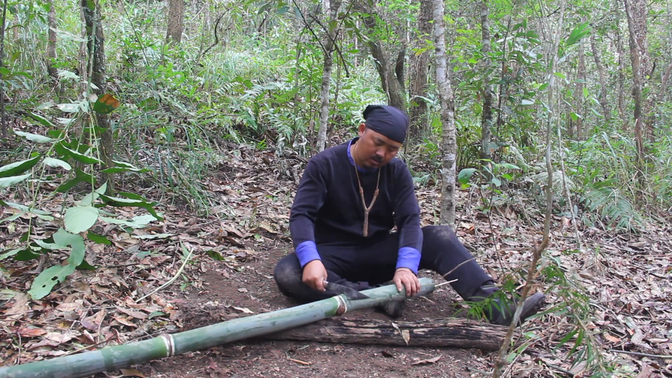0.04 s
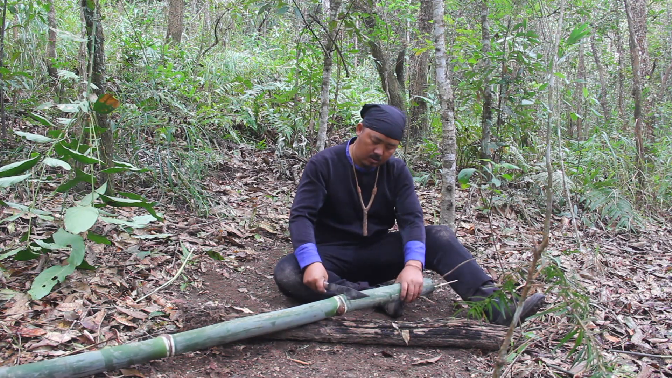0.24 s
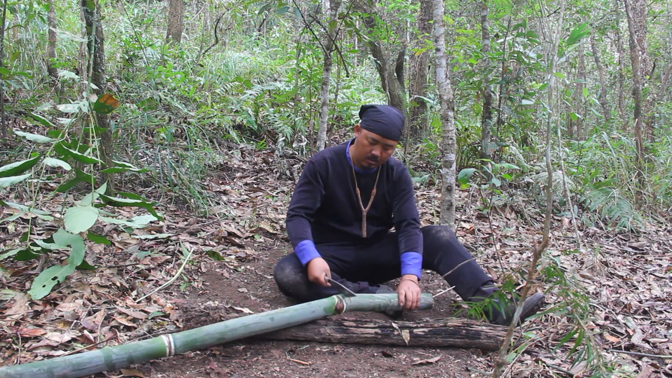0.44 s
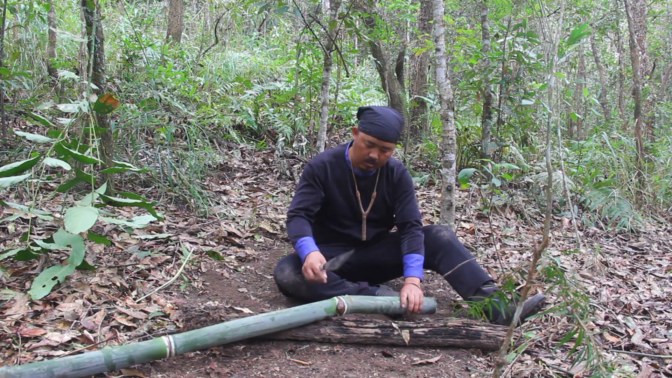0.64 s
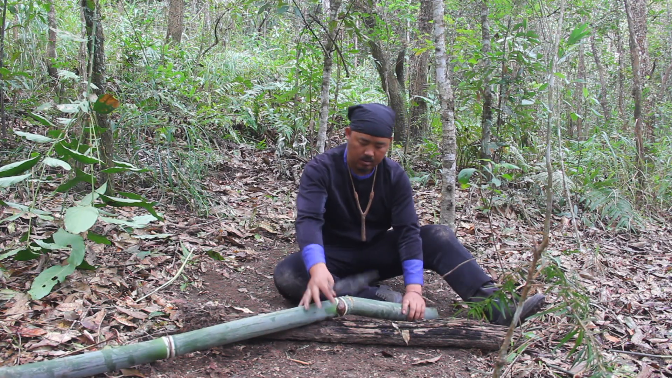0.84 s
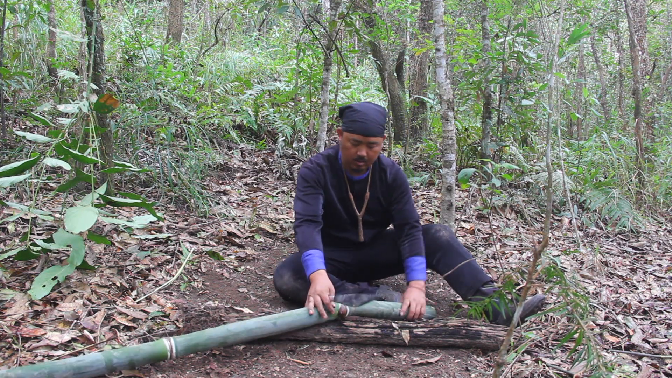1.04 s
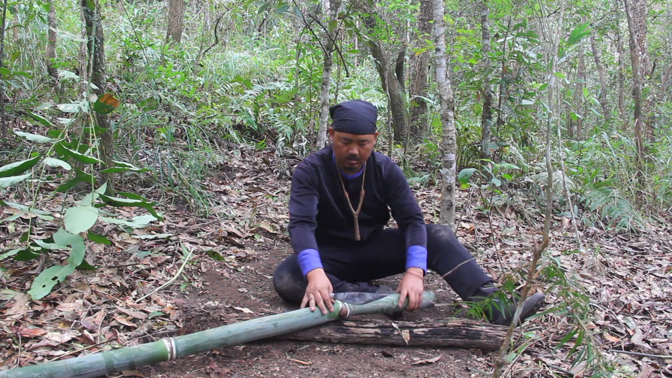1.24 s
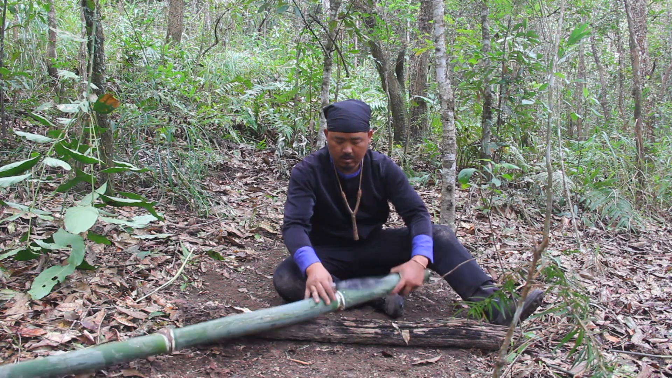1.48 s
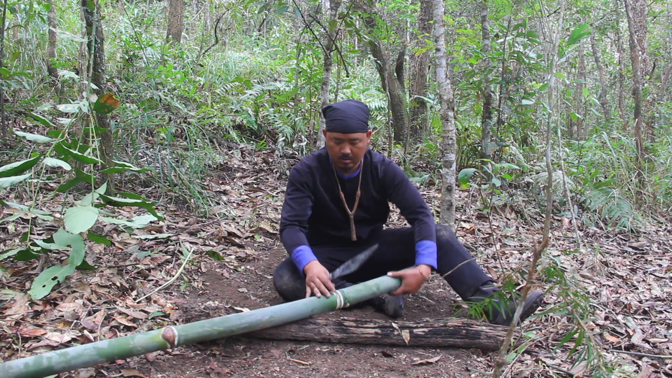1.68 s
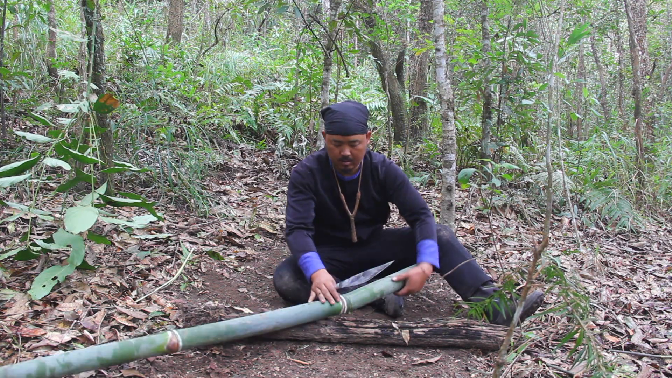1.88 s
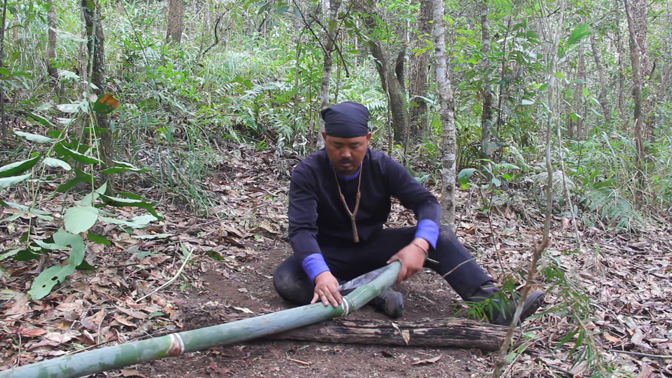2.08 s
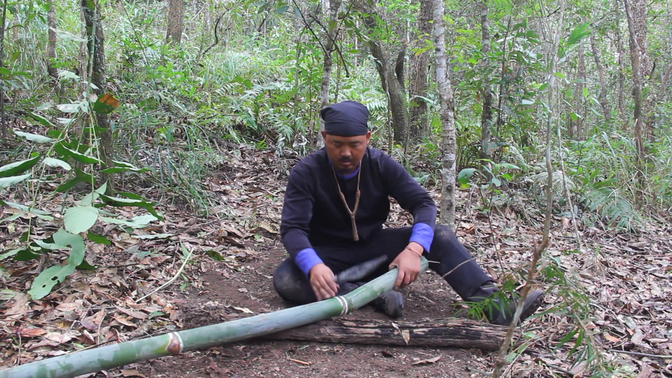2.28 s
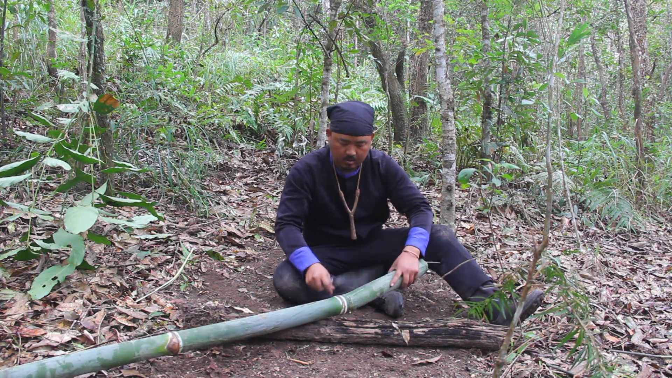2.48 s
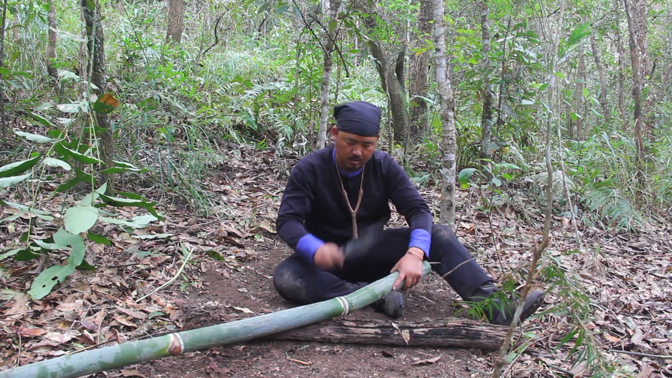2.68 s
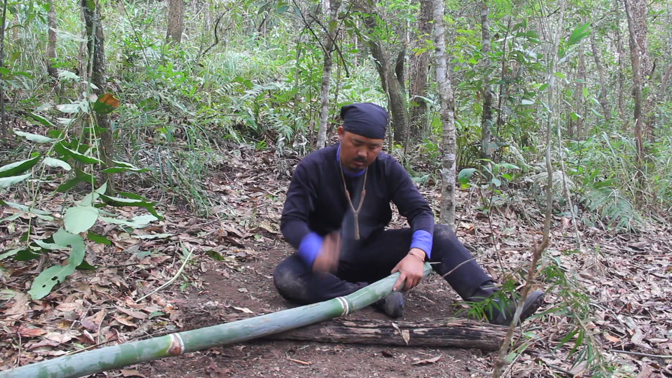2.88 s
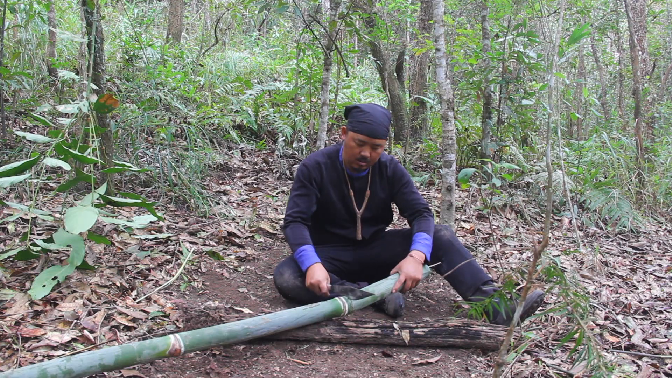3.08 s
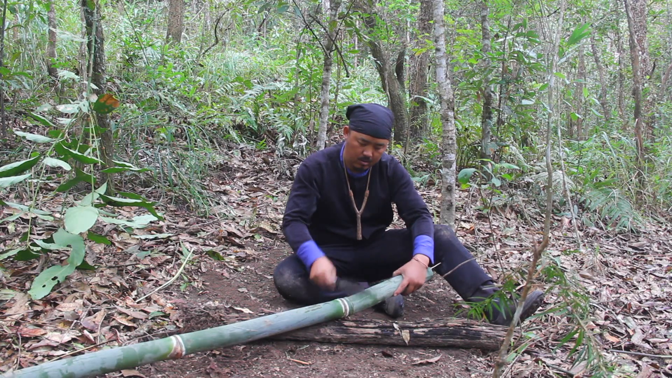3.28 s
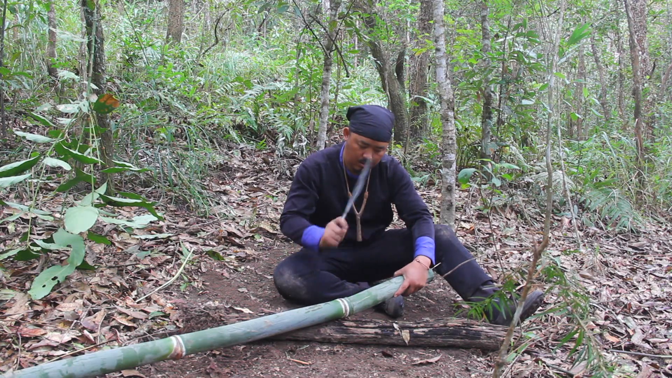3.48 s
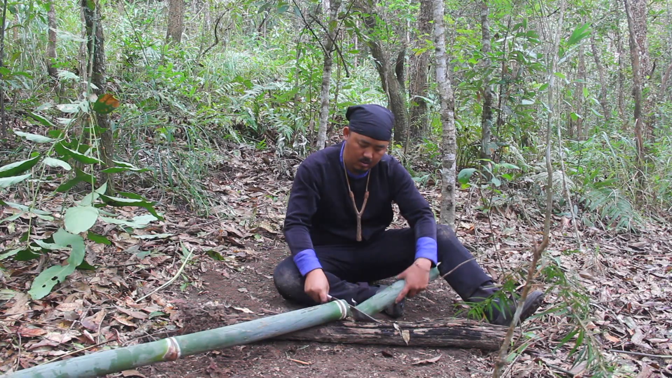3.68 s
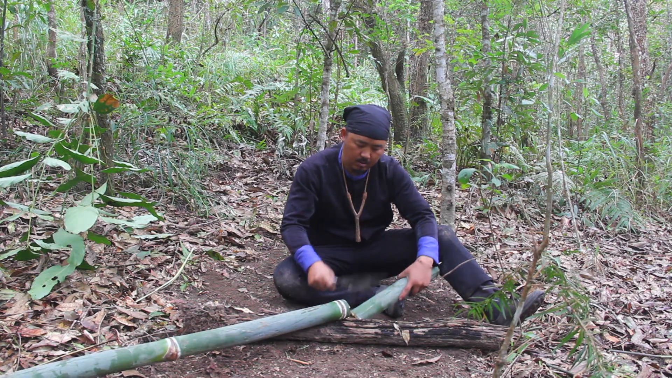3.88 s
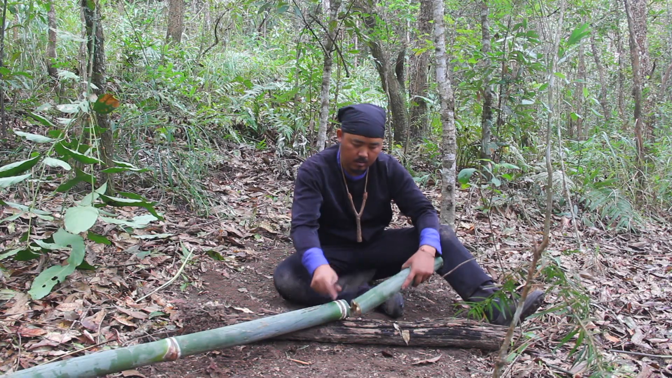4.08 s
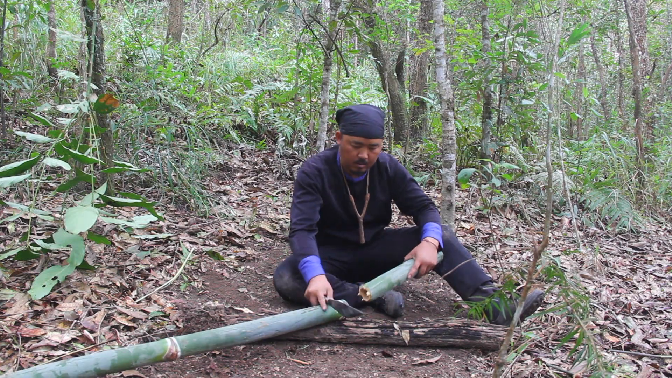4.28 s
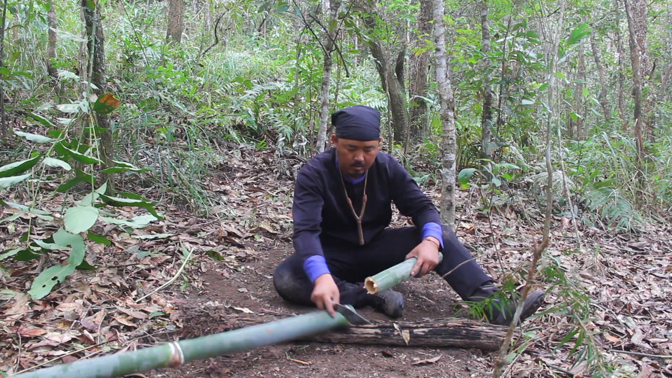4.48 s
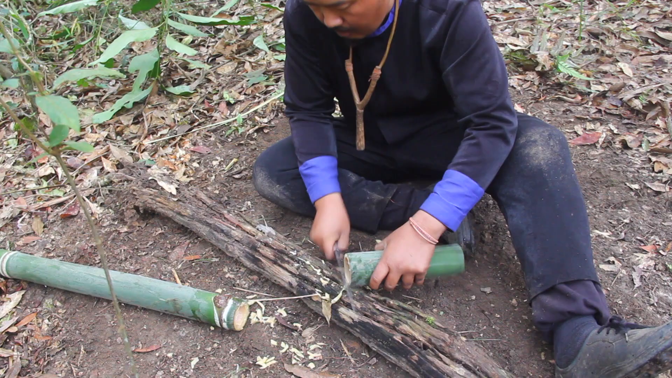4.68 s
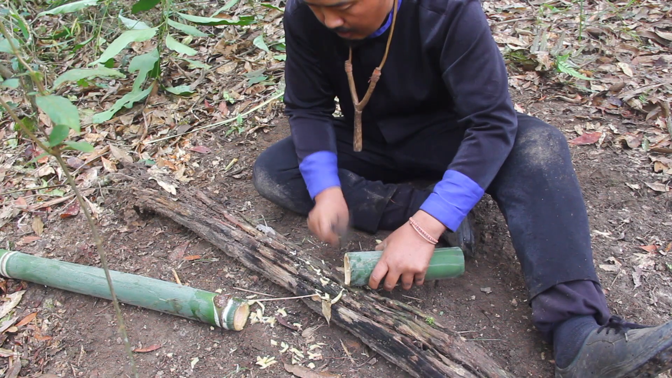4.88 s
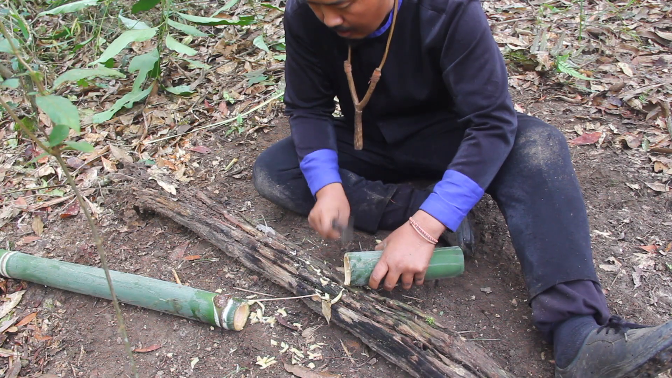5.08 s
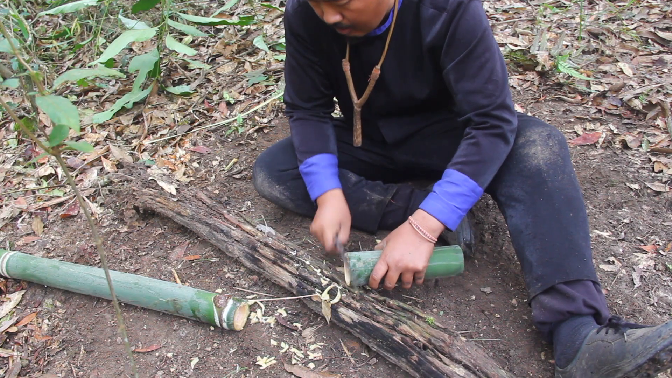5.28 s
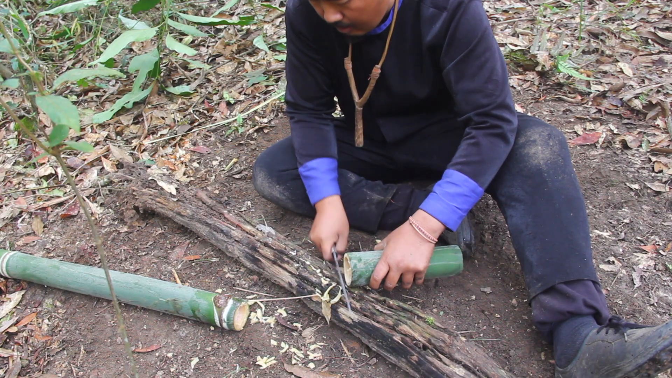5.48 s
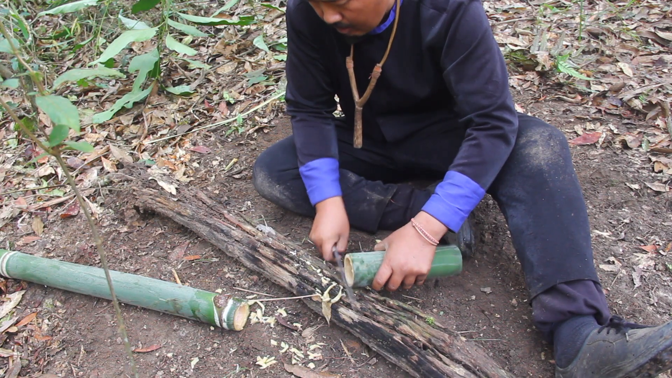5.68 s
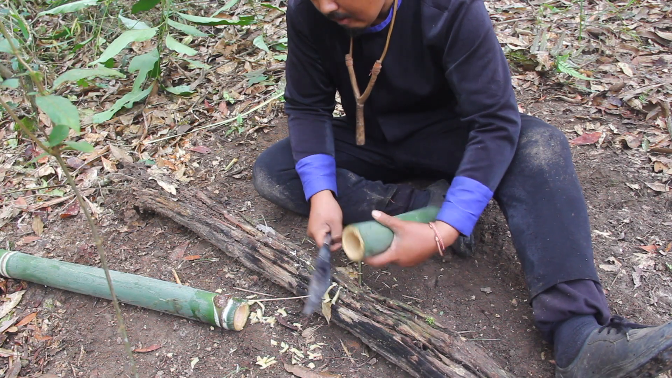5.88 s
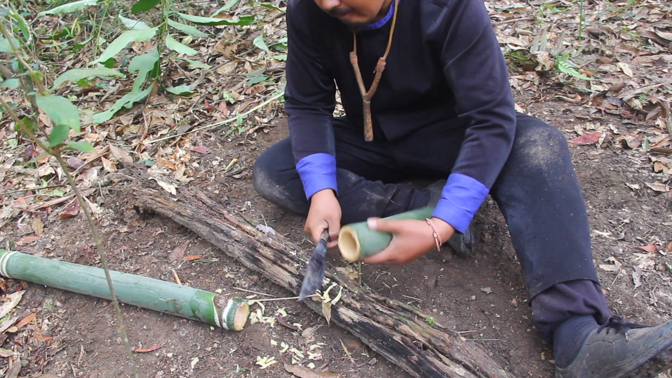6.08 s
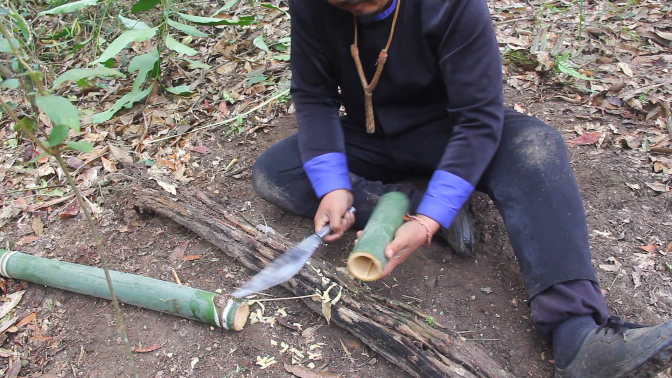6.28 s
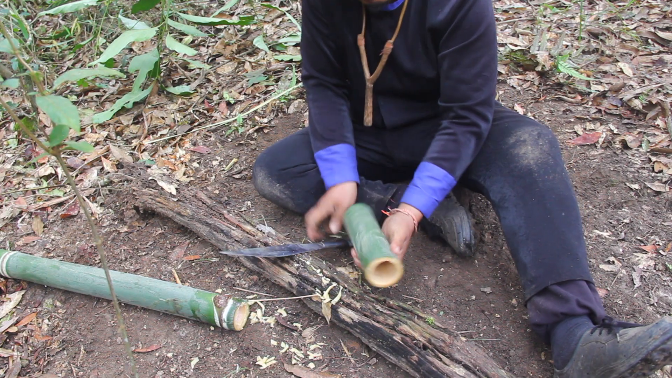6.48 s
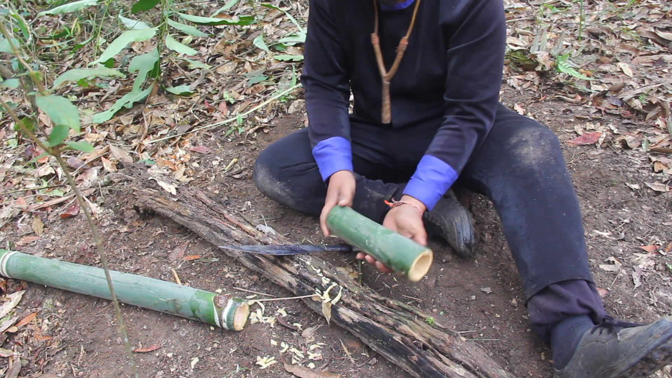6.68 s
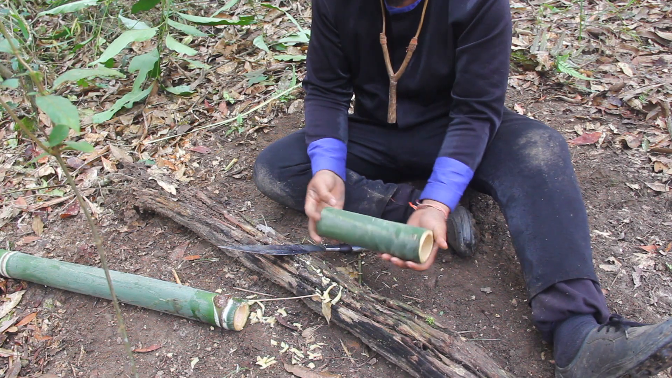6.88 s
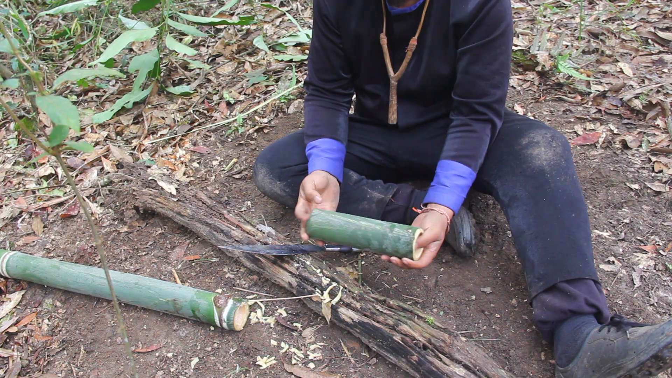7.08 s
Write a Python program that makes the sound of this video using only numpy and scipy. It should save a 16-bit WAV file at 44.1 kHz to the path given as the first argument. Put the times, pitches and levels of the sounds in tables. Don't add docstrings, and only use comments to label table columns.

```python
import sys
import numpy as np
from scipy import signal
from scipy.io import wavfile
from scipy.ndimage import uniform_filter1d

SR = 44100
rng = np.random.default_rng(int(sys.argv[2]) if len(sys.argv) > 2 else 0)


def decibels_to_gain(level_db):
    exponent = np.asarray(level_db, float) / 20
    return 10 ** exponent


def output_pcm(signal):
    pcm = np.clip(np.atleast_2d(signal).T, -1, 1) * 32767
    wavfile.write(sys.argv[1], SR, np.round(pcm).astype(np.int16))


N = 314874

CHANGE_S = 4.714
POLE_THROUGH_S, PIECE_THROUGH_S = 3.5, 5.1

# start in seconds, peak in dB, bite in ms, and the
# hollow ring and wall ring in Hz that the struck spot favours.
CHOPS = [
    (-.04, 8.5, 4.5, 600, 1800),
    (2.953, 7.5, 4.56, 251.6, 3500),
    (3.605, 6, 4.8, 466, 1874),
]
# start in seconds, peak in dB, thud in dB, favoured hollow ring in Hz, favoured wall
# ring in Hz.
BUMPS = [
    (.967, -23, -28, 242, 3500),
    (2.542, -11.5, -14.5, 370, 2055),
    (3.284, -24, -47.5, 652, 2780),
    (3.858, -43, -40, 130, 1000),
    (4.305, -16, -21, 460, 1846),
    (4.548, -20.5, -32, 450, 1300),
    (4.577, -25, -31, 450, 1300),
    (4.641, -8, -14, 630, 2770),
]
# start in seconds, peak in dB, bite in ms,
# favoured hollow ring in Hz, favoured wall ring in Hz.
TRIMS = [
    (4.728, -.5, 9.5, 380, 3576),
    (4.9767, 0, 9.5, 622, 4450),
    (5.232, 0.5, 5.4, 802, 6400),
    (5.4788, 2.5, 6.2, 481.5, 5460),
    (5.7197, -2.5, 2.52, 417, 2435),
]
# start in seconds, peak in dB, thud in dB,
# favoured hollow ring in Hz, favoured wall ring in Hz.
TAPS = [
    (5.524, -17.5, -62, 620, 3940),
    (6.34, -51, -39.5, 362, 1290),
    (6.363, -49, -36.5, 405, 1300),
    (6.412, -50.5, -43, 340, 1620),
]
# start in seconds, peak in dB, graze in ms.
GRAZES = [(4.625, -21.5, 5), (4.631, -10.5, 11), (4.717, -6.5, 8.5), (4.972, -25, 2.8), (5.222, -13.5, 13),
          (5.472, -18.5, 5), (5.703, -26, 12)]
GRAZE_LEAD_S = .022
CHOP_THUD_DB, CHOP_ECHO_DB, BUMP_ECHO_DB = -5.5, -35, -37.5
TRIM_THUD_DB, TRIM_ECHO_DB, TAP_ECHO_DB = 0, -44, -38
BUMP_MS = 3.3
THUD_LOSS_DB_PER_MS = 2.24
FULL_BITE_MS = 8.9

# pitch in Hz, width in Hz, level in dB.
POLE_WALL = [(1000, 200, -5), (1270, 120, -13), (2030, 430, -2), (2257, 99, 2.5), (2750, 750, -7.5),
             (3596, 300, 3), (4530, 440, -4.5), (5040, 83, -3), (5580, 270, -8.5), (7100, 250, -4.5),
             (7850, 1200, -10), (10800, 600, -31.5)]
PIECE_WALL = [(804, 450, 0.5), (1350, 420, 3), (1780, 370, 3.5), (2435, 220, -8.5), (2670, 70, -6.5),
              (3060, 590, 2), (4140, 405, -4), (4450, 160, -1), (5460, 750, -13.5), (6680, 160, -6),
              (7020, 55, -9.5), (7910, 380, -4.5), (9130, 110, -15.5), (13000, 900, -16)]
# pitch in Hz, level in dB,
# time to die by 60 dB in seconds.
POLE_CUT = [(76.1, -36, 0.62), (107, -33.5, 0.44), (196.8, -22, .8), (303, -1, 0.021), (676, -10, 0.035),
            (2074, 8, 0.0195)]
POLE_LOOSE = [(174, -18, 0.33), (202, -18, .45), (284.2, -3.5, .11), (491, 6.5, 0.023), (616, -4.5, 0.12),
              (1040, -3.5, .03)]
PIECE = [(106, -14, 0.12), (300, -21.5, .036), (366.5, -2, 0.023), (622, -10.5, 0.098), (800, -4, 0.01),
         (1200, 5.5, 0.021), (1886, 21.5, 0.029)]
POLE_PARTING = [(100.7, -30, 0.37), (198, -17.5, 0.72), (317, -16, .4), (441, -20, 0.079),
                (474, -11.5, 0.18), (872, -11, 0.18), (1940, 12, 0.016)]
POLE_STUB = [(104, -18, 0.1), (207, -26, 0.27), (451, -14, 0.11), (630, -15.5, 0.065), (936, 0, 0.06)]
PIECE_DOWN = [(97.6, -29, 0.19), (301.6, -6.5, 0.1), (340, -2.5, 0.058), (421.7, 2.5, 0.0372),
              (638, 3.5, .036), (810, 1, 0.026), (967, -4.5, .016), (1350, 2, 0.031)]
# low edge in Hz, high edge in Hz, time to die in seconds, level in dB.
LOG = [(140, 860, 0.12, -7.5), (540, 2240, 0.042, 5.5), (1400, 4300, .04, -5)]
CHOP_FAVOUR = [(4.9, .3), (4.3, 0.26, -1.5), 5.5]
TRIM_FAVOUR = [(15.6, 0.11), (11, .12, -1), 3]
KNOCK_FAVOUR = [(7.6, 0.3), (5, .5, 0), 3.5]

# start in seconds, peak in dB, thud in dB.
CRACK = [(.374, 1, -26.5)]
HEEL = [
    (1.415, -60, -53),
    (1.74, -30.5, -43),
]
# pitch in Hz, level in dB, time to die in seconds.
CRACKED = [(184, -24, .4), (555, 6, 0.076), (965, 4.5, .15), (1800, 15, .063)]
SOIL = [(77.5, -9, 0.51), (178, 7, 0.08)]
CRACK_MS, CRACK_ECHO_DB = 2.1, -35

# start in seconds, peak in dB.
SNAPS = [(0.349, -18.5), (.4027, -28), (.43, -22.5), (0.46, -19), (0.4815, -14), (0.491, -21),
         (0.5262, -24), (.5337, -21), (0.5758, -26), (0.5875, -30.5), (0.799, -28.5), (.8135, -23.5),
         (0.8616, -18.5), (.891, -16)]
RIPS = [(0.3417, -19), (0.3589, -10), (0.3652, -6), (0.51, -25.5), (0.706, -30), (0.786, -27), (0.813, -17),
        (.83, -16), (0.8427, -24), (0.8498, -16.5), (0.874, -22)]
SNAP_MS, RIP_MS = 2.8, 8
# pitch in Hz, width in Hz, level in dB.
SPLIT_BODY = [(600, 196, -2), (1000, 190, 1), (1800, 180, 0.5), (3580, 160, 11), (5100, 160, 6),
              (6400, 580, 1.5), (10360, 620, -16.5)]

# middle in seconds, half width in seconds, level in dB.
LEAVES = [(0.386, .024, -31), (0.896, 0.028, -38.5), (1.082, 0.059, -50), (1.319, 0.0087, -58.5),
          (1.412, 0.053, -45), (1.981, 0.033, -41), (2.1, 0.023, -52.5), (2.434, 0.022, -51),
          (3.314, 0.012, -48), (4.608, 0.017, -43), (4.681, 0.074, -40.5)]
SLEEVES = [(.45, 0.018, -46), (.55, 0.067, -49.5), (1.23, 0.054, -57.5), (1.55, 0.045, -51),
           (1.653, 0.032, -43.5), (1.83, 0.076, -51), (2.25, 0.12, -59), (3.541, 0.0039, -56.5),
           (4.46, 0.041, -47.5), (4.548, 0.019, -44.5), (6.2, 0.041, -52), (6.33, 0.054, -47.5),
           (6.5, 0.081, -52), (6.72, 0.054, -54.5), (6.897, 0.054, -49)]
LEAF_TOP_DB, SLEEVE_TOP_DB = -8, -20.5
# pitch in Hz, level in dB.
LITTER = [(150, -17), (400, -5.5), (1000, -3.5), (2500, -2), (5000, -3), (8000, -9), (12000, -23.5)]
# start in seconds, peak in dB.
TICKS = [(1.049, -31), (1.0722, -31), (1.135, -36.5), (1.1939, -29), (1.3865, -30), (1.416, -30),
         (1.4497, -29), (1.5476, -37), (1.5885, -29.5), (1.6489, -30.5), (1.7377, -38), (1.7705, -36),
         (1.9163, -29), (1.949, -33.5), (2.0846, -38.5), (2.1117, -34), (2.4037, -31), (4.4265, -34.5),
         (4.4536, -23), (4.4775, -57), (4.4971, -30), (4.5494, -49.5), (4.7057, -19.5), (5.7484, -33.5),
         (5.787, -39.5)]
TICK_LOW_HZ, TICK_SPAN_OCT = 4300, .9
# start in seconds, length in seconds, level in dB, pitch in Hz.
SQUEAKS = [
    (5.94, .07, -65, 3300),
    (6.737, .094, -55, 3260),
    (6.875, .072, -58.5, 1800),
    (6.874, .05, -52, 3700),
    (6.862, .058, -50.5, 5350),
]

# pitch in Hz, level in dB.
HUSH = [(22, -10), (40, -3), (75, 7), (180, 7.5), (600, 4), (1500, 1), (3400, -4), (8000, -9.5),
        (12000, -16), (15500, -25.5)]
HUSH_DB = -56.5
LEAF_HISS_DB = -72.5, -98
# pitch in Hz, time to die in seconds.
ECHO_T60 = [(200, 0.44), (600, 1), (2000, 0.84), (5500, 0.71), (12000, 0.2)]
# pitch in Hz, level in dB.
ECHO_COLOUR = [(200, -14), (800, -1), (3000, -0.5), (12000, 9)]
EDGES = 22 * 2 ** np.arange(0, 9.6, .5)


def at_hz(points, hz):
    points = np.array(points)
    return np.interp(np.log(hz), np.log(points[:, 0]), points[:, 1])


def unit(x):
    return x / np.sqrt(np.mean(x ** 2) + 1e-20)


def add(out, x, s):
    i = round(s * SR)
    x = x[max(-i, 0):len(out) - i]
    out[max(i, 0):max(i, 0) + len(x)] += x


def band_pass(x, low, high, order=2):
    return signal.sosfilt(signal.butter(order, [low, high], "band", fs=SR, output="sos"), x)


def bands(white, gain):
    out = 0
    for k, (low, high) in enumerate(zip(EDGES, EDGES[1:])):
        out = out + gain(low * 2 ** .25) * band_pass(white[k % 2], low, high)
    return out


def resonate(x, peaks, spread):
    out = 0
    for k, (hz, width, db) in enumerate(peaks):
        r = np.exp(-np.pi * width * spread / SR)
        b = (1 - r * r) / 2 * np.array([1, 0, -1])
        a = [1, -2 * r * np.cos(2 * np.pi * hz / SR), r * r]
        out = out + (-1) ** k * decibels_to_gain(db) * signal.lfilter(b, a, x + 1e-18)
    return out


def grit(size, spread_db):
    return decibels_to_gain(spread_db * np.minimum(rng.exponential(1, size), 4)) * rng.standard_normal(size)


def burst(ms, fade_ms):
    t = np.arange(2000) / SR * 1000
    onset = np.minimum(t / .3, 1)
    slowing = decibels_to_gain(-7 * np.minimum(t / ms, 1))
    fade = np.exp(-np.maximum(t - ms, 0) / fade_ms)
    tear = grit(size=len(t), spread_db=6.5) * onset * slowing * fade
    tear[8] += 5.0
    return tear


def forest():
    t = np.arange(SR) / SR
    dying = lambda hz: decibels_to_gain(at_hz(ECHO_COLOUR, hz) - 60 * t / at_hz(ECHO_T60, hz))
    tail = bands(rng.standard_normal((2, SR)), dying) * (1 - np.exp(-t / 0.0052))
    return tail / np.sqrt(np.sum(tail ** 2)) * 10


def log_knock(t):
    t = t[:SR // 4]
    noise = rng.standard_normal(len(t))
    out = 0
    for low, high, t60, db in LOG:
        out = out + decibels_to_gain(db - 60 * t / t60) * unit(band_pass(noise, low, high, order=3))
    return out


def favour(rows, column, hz, lift_db, octaves, above_db=0):
    rows = np.array(rows, float)
    away = np.log2(rows[:, 0] / hz)
    rows[:, column] += lift_db * np.exp(-.5 * (away / octaves) ** 2) + above_db * np.maximum(away, 0)
    return rows


def body(wall, hollow, hollow_hz, wall_hz, rule, share=1):
    (lift_db, octaves), wall_rule, reach = rule
    wall = favour(wall, 2, wall_hz, *wall_rule)
    hollow = favour(hollow, 1, hollow_hz, share * lift_db, octaves)
    return wall, hollow, min(reach * wall_hz, 15000)


def blow(bites, wall, hollow, thud_db, echo_db, echo, top_hz):
    near, around, t = np.zeros(SR), np.zeros(SR // 8), np.arange(SR) / SR
    for s, db, ms in bites:
        tear = burst(ms, fade_ms=0.83)
        bite = resonate(tear, wall, spread=1.13)
        bite = bite + decibels_to_gain(-6.0) * signal.lfilter([.5], [1, -.45], tear)
        bite = band_pass(bite, 250, top_hz)
        bite = decibels_to_gain(db) * bite / np.abs(bite).max()
        add(near, bite, s - bites[0][0])
        click = signal.unit_impulse(len(tear))
        blurred = resonate(click, wall, spread=2.0) + decibels_to_gain(-29.0) * click
        add(around, unit(blurred) * np.std(bite), s - bites[0][0])
    main_s = s - bites[0][0]
    rings = []
    for k, (hz, db, t60) in enumerate(hollow):
        rings.append((-1) ** k * decibels_to_gain(db - 60 * t / t60) * np.sin(2 * np.pi * hz * t))
    rings = np.array(rings)
    stiff = np.array(hollow)[:, 0] > 1500
    knock = decibels_to_gain(thud_db) * (stiff @ rings) * (1 - np.exp(-t / 0.00075))
    add(near, knock, main_s)
    thud = ~stiff @ rings
    add(thud, log_knock(t), 0)
    thud = decibels_to_gain(thud_db) * thud * (1 - np.exp(-t / 0.0015))
    add(near, thud, main_s + 0.631 * ms / 1000)
    add(around, decibels_to_gain(-1.5) * thud, 0)
    return near + decibels_to_gain(echo_db) * signal.fftconvolve(around, echo)[:SR]


def strike(out, s, db, ms, wall, hollow, top_hz, thud_db, echo_db, echo):
    bites = [graze for graze in GRAZES if 0 < s - graze[0] < GRAZE_LEAD_S] + [(s, db, ms)]
    add(out, blow(bites, wall, hollow, thud_db, echo_db, echo, top_hz), bites[0][0])


def cut(out, rows, wall, hollows, through_s, rule, base_thud_db, echo_db, echo):
    for s, db, ms, *spots in rows:
        thud_db = db + base_thud_db - THUD_LOSS_DB_PER_MS * ms
        struck = body(wall, hollows[s > through_s], *spots, rule, ms / FULL_BITE_MS)
        strike(out, s, db, ms, *struck, thud_db, echo_db, echo)


def bump(out, rows, wall, hollows, through_s, echo_db, echo):
    for s, db, thud_db, *spots in rows:
        struck = body(wall, hollows[s > through_s], *spots, KNOCK_FAVOUR)
        strike(out, s, db, BUMP_MS, *struck, thud_db, echo_db, echo)


def chopping(echo):
    before, after = np.zeros(round(CHANGE_S * SR)), np.zeros(N)
    held, loose, piece = (POLE_CUT, POLE_PARTING), (POLE_LOOSE, POLE_STUB), (PIECE, PIECE_DOWN)
    cut(before, CHOPS, POLE_WALL, held, POLE_THROUGH_S, CHOP_FAVOUR, CHOP_THUD_DB, CHOP_ECHO_DB, echo)
    bump(before, BUMPS, POLE_WALL, loose, POLE_THROUGH_S, BUMP_ECHO_DB, echo)
    cut(after, TRIMS, PIECE_WALL, piece, PIECE_THROUGH_S, TRIM_FAVOUR, TRIM_THUD_DB, TRIM_ECHO_DB, echo)
    bump(after, TAPS, PIECE_WALL, piece, PIECE_THROUGH_S, TAP_ECHO_DB, echo)
    for rows, rings in ((CRACK, CRACKED), (HEEL, SOIL)):
        for s, db, thud_db in rows:
            strike(before, s, db, CRACK_MS, POLE_WALL, rings, 12000, thud_db, CRACK_ECHO_DB, echo)
    add(after, before, 0)
    return after


def hush():
    smooth = unit(bands(rng.standard_normal((2, N)), lambda hz: decibels_to_gain(at_hz(HUSH, hz))))
    high = signal.butter(2, 9000, "high", fs=SR, output="sos")
    canopy = unit(signal.sosfilt(high, rng.standard_normal(N)))
    hiss_db = np.where(np.arange(N) < CHANGE_S * SR, *LEAF_HISS_DB)
    return decibels_to_gain(HUSH_DB) * smooth + decibels_to_gain(hiss_db) * canopy


def splitting(echo):
    out = np.zeros(N)
    for rows, ms in ((SNAPS, SNAP_MS), (RIPS, RIP_MS)):
        for s, db in rows:
            tear = burst(.7 * ms, fade_ms=2.2)
            tear = tear + decibels_to_gain(-18) * burst(ms, fade_ms=10.5)
            snap = resonate(tear, SPLIT_BODY, spread=2.4)
            snap = snap + decibels_to_gain(-17.0) * np.diff(tear, prepend=0)
            add(out, decibels_to_gain(db) * snap / np.abs(snap).max(), s)
    add(out, decibels_to_gain(-38) * signal.fftconvolve(out[:SR], echo), 0)
    return out


def rustle():
    t, level, bright = np.arange(N) / SR, 0, 0
    clumps = decibels_to_gain(2.2 * unit(uniform_filter1d(rng.standard_normal(N), size=300)))
    litter = grit(size=(2, N), spread_db=2.0) * clumps
    litter = unit(bands(litter, lambda hz: decibels_to_gain(at_hz(LITTER, hz))))
    crisp = unit(band_pass(grit(size=N, spread_db=5.5) * clumps, 6500, 15000))
    for rows, top_db in ((LEAVES, LEAF_TOP_DB), (SLEEVES, SLEEVE_TOP_DB)):
        for s, width, db in rows:
            same_place = (t < CHANGE_S) == (s < CHANGE_S)
            swell = decibels_to_gain(db) * np.exp(-.5 * ((t - s) / width) ** 2) * same_place
            level = level + swell
            bright = bright + decibels_to_gain(top_db) * swell
    return level * litter + bright * crisp


def ticks():
    out = np.zeros(N)
    for s, db in TICKS:
        hz = TICK_LOW_HZ * 2 ** (TICK_SPAN_OCT * rng.random() ** 2)
        crack = resonate(burst(ms=0.64, fade_ms=1.0), [(hz, hz, 0)], spread=0.74)
        add(out, decibels_to_gain(db) * crack / np.abs(crack).max(), s)
    return out


def squeaks():
    out = np.zeros(N)
    for s, length, db, hz in SQUEAKS:
        tone = rng.standard_normal(round(length * SR))
        for _ in range(2):
            tone = resonate(tone, [(hz, 380, 0)], spread=1)
        add(out, decibels_to_gain(db) * unit(tone) * np.hanning(len(tone)), s)
    return out


def scene():
    echo = forest()
    mix = chopping(echo) + hush() + splitting(echo) + rustle() + ticks() + squeaks()
    return mix[None]


def top_cut(x):
    return signal.sosfilt(signal.butter(12, 15820, fs=SR, output="sos"), x)


def record(dry):
    return top_cut(np.clip(dry, -1, 1))


dry = scene()
out = record(dry)
output_pcm(out)
```